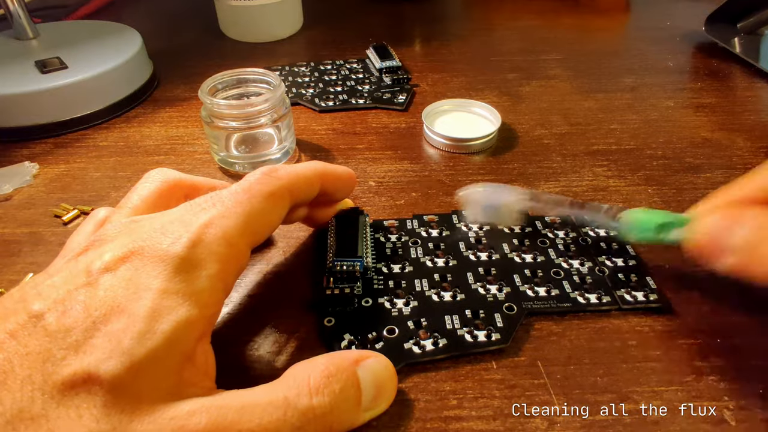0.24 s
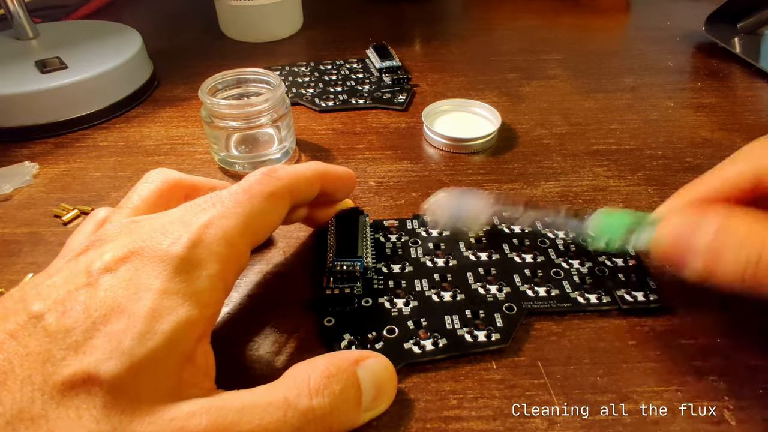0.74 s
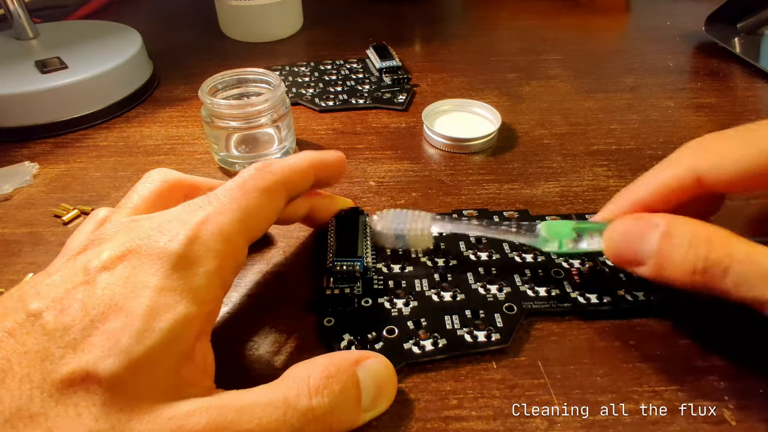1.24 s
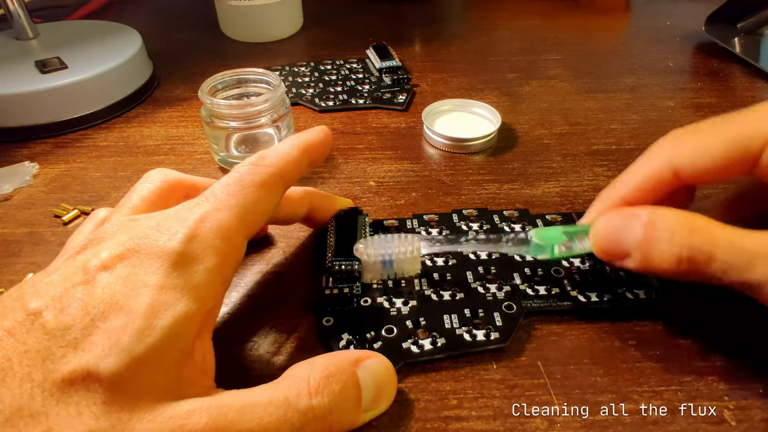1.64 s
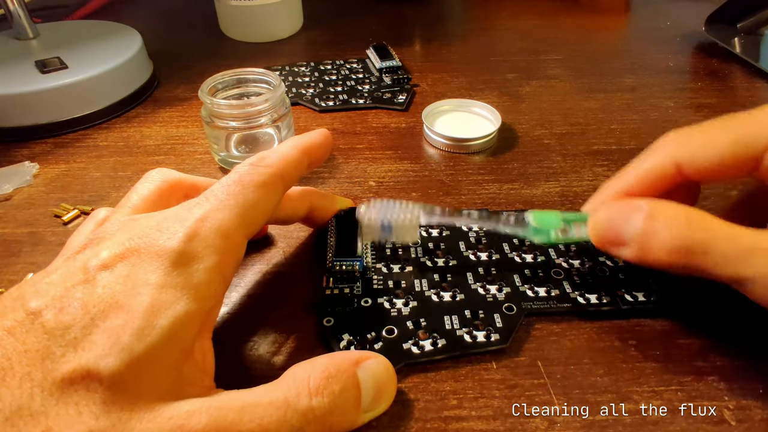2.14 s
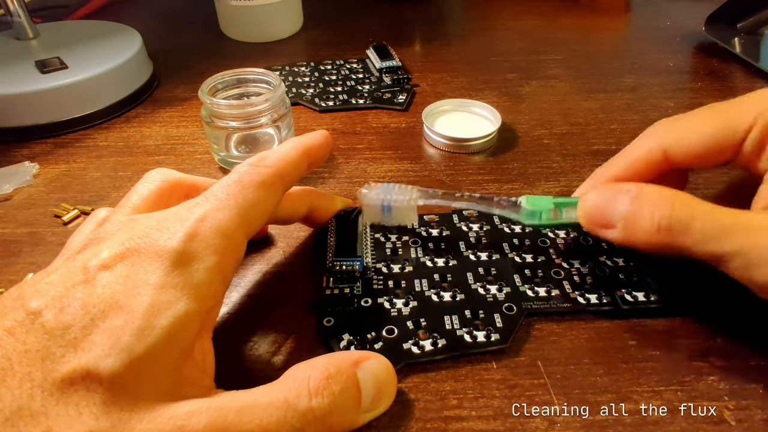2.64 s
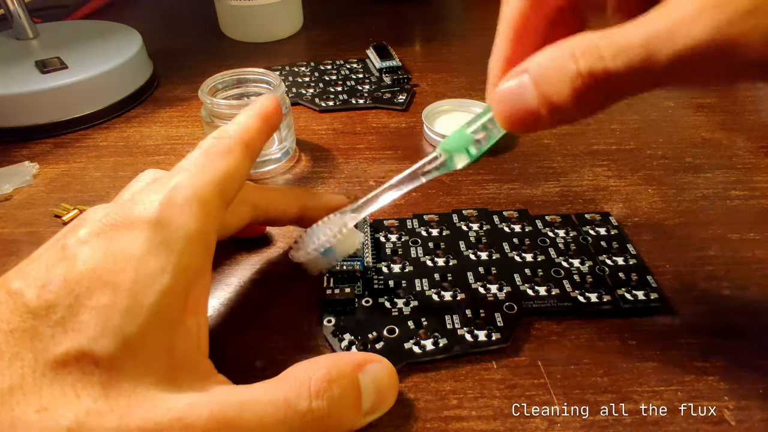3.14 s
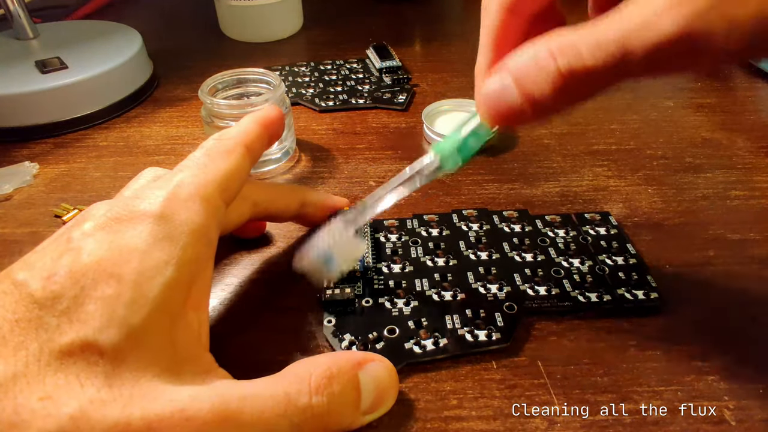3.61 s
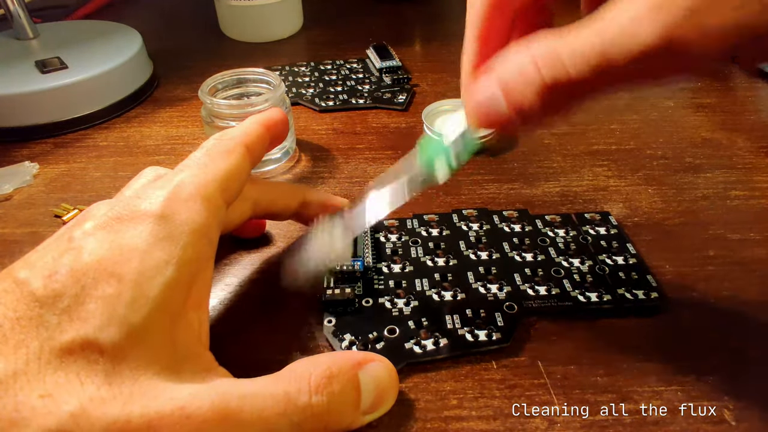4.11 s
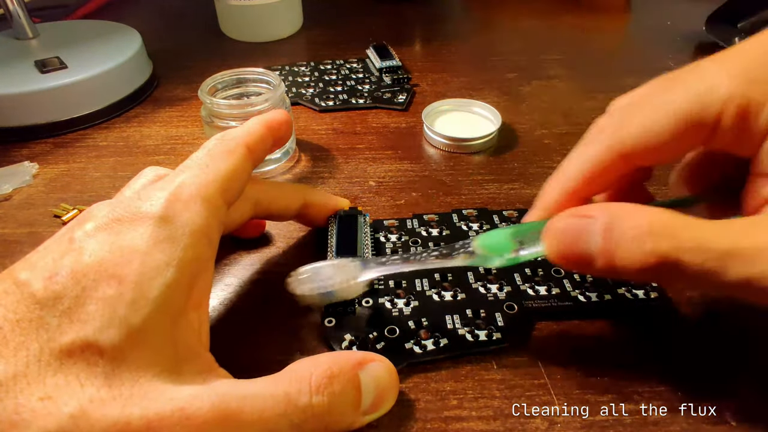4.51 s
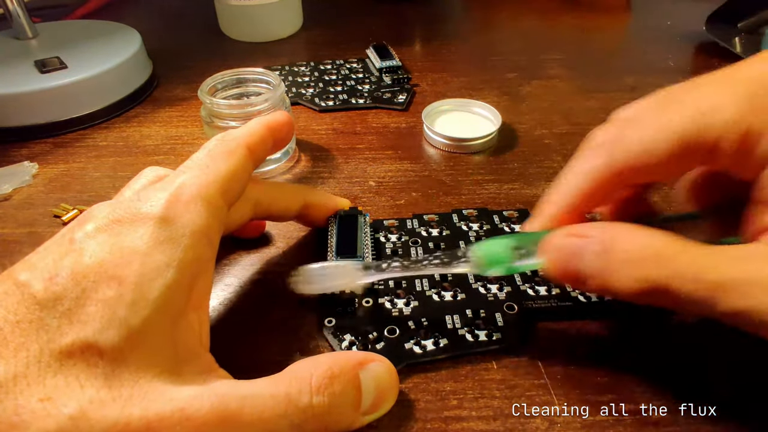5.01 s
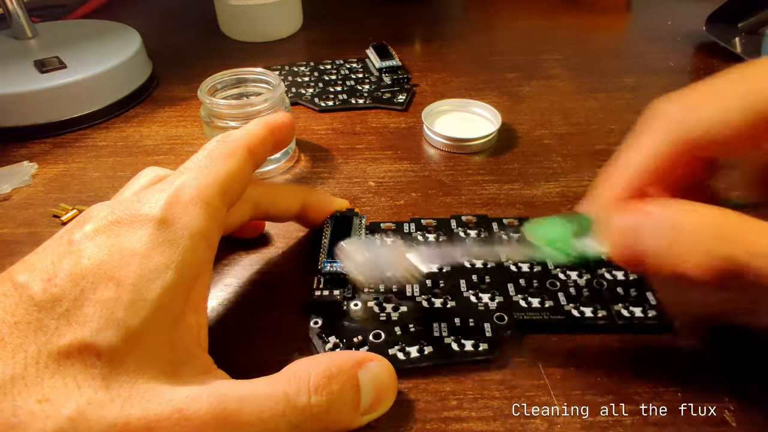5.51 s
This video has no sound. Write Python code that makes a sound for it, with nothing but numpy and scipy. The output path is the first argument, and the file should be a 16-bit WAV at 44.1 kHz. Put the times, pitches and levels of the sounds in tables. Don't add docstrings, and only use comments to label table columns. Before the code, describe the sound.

A toothbrush scrubs a circuit board in quick, even strokes, the board knocking on a wooden desk, then something hard lands with a clatter.

```python
import sys
import numpy as np
from scipy import signal
from scipy.fft import rfft, irfft
from scipy.io import wavfile
from scipy.ndimage import uniform_filter1d

SR = 44100
rng = np.random.default_rng(int(sys.argv[2]) if len(sys.argv) > 2 else 0)


def magnitude_from_level(level_db):
    exponent = np.asarray(level_db, float) / 20
    return 10 ** exponent


def wrap_up_sound(samples):
    columns = np.atleast_2d(samples).T
    tamed = np.clip(columns, -1, 1)
    steps = np.round(tamed * 32767).astype(np.int16)
    wavfile.write(sys.argv[1], SR, steps)


N = 253575
TIME = np.arange(N) / SR

# [t/s, deep rumble level/dB, second rumble level/dB]
TRAFFIC = [(0, -51, -70), (.45, -46, -54.5), (.8, -50, -69.5), (1.25, -44.5, -64), (1.6, -54, -70),
           (2.4, -46.5, -80), (2.7, -45, -56), (3.2, -55, -61), (3.55, -41.5, -66), (4.2, -45, -52),
           (4.6, -47, -45), (5.75, -44.5, -61)]
# [t/s, lower drone level/dB, upper drone level/dB]
DRONE = [(0.0, -48, -56), (0.07, -55, -70), (0.15, -55, -52), (0.66, -66, -70), (0.78, -53, -51),
         (1.21, -44, -86), (1.93, -53.5, -62), (1.99, -57, -79), (2.1, -61, -46), (2.33, -80, -58),
         (2.54, -47.5, -72), (2.83, -62.5, -61), (2.88, -53, -43.5), (3.0, -69, -72), (3.46, -64.5, -65),
         (4.44, -50, -58), (4.53, -57, -61), (5.5, -58, -50)]
# [f/Hz, level/dB per Hz]
AIR = [(60, -18), (110, 5.5), (180, -9), (260, -4), (480, -14.5), (1500, -21), (5000, -33), (16000, -45)]

# [middle t/s, half length/s,
# bristle hiss level/dB]
FIELD = [(0.033, 0.044, -41.5), (0.113, 0.021, -38), (0.168, 0.047, -38.5), (0.292, 0.042, -37),
         (0.417, 0.051, -37), (0.543, 0.039, -36.5), (0.663, 0.053, -37), (0.788, 0.048, -37.5),
         (0.911, 0.037, -35.5), (1.023, 0.05, -38), (1.158, 0.042, -39), (1.288, 0.033, -46),
         (1.415, 0.013, -49.5), (1.533, 0.022, -44.5), (1.644, 0.035, -40), (1.715, 0.026, -54.5),
         (1.868, 0.04, -56), (2.03, 0.051, -56.5), (2.92, 0.055, -54.5)]
# [t/s, half length/s, level/dB]
BESIDE_PINS = [
    (2.112, 0.02, -50.5),
    (2.211, 0.03, -50.5),
    (2.328, 0.026, -49),
    (2.433, 0.029, -44),
    (2.529, 0.051, -46),
    (2.649, 0.031, -41),
    (2.756, 0.04, -44.5),
    (2.863, 0.026, -36.5),
]
# [t/s, half length/s, level/dB]
MODULE = [(3.354, 0.028, -54), (3.474, 0.023, -49), (3.569, 0.024, -44), (3.685, 0.025, -44.5),
          (3.777, 0.025, -40), (3.884, 0.022, -43), (3.973, 0.022, -37), (4.076, 0.016, -41.5),
          (4.172, 0.022, -36), (4.268, 0.026, -40.5), (4.37, 0.042, -46), (4.5, 0.049, -71)]
# [t/s, half length/s, level/dB]
LEFT_EDGE = [
    (4.602, 0.031, -56),
    (4.722, 0.036, -42.5),
    (4.841, 0.037, -41),
    (4.972, 0.032, -39.5),
    (5.072, 0.037, -39.5),
    (5.198, 0.03, -37.5),
    (5.311, 0.034, -37),
    (5.435, 0.035, -36),
    (5.522, 0.017, -43),
    (5.581, 0.012, -38.5),
]
# [tuft scratch relative level/dB, board shake relative level/dB, shake per stroke/dB per dB]
FIRM = [
    (-10, -12.5, 0.93),
    (-7, -6.5, 0.31),
    (-8, -10, 0.5),
    (-6.5, -6, 0.65),
]
# [t/s, place/0-3 in the order above]
PLACE = [(0, 0), (1.7, 0), (2.0, 1), (3.0, 1), (3.2, 2), (4.5, 2), (4.65, 3), (5.75, 3)]
# [t/s, share/0-1]
OVER_PINS = [(0, 0), (1.6, 0), (2.0, 1), (4.4, 1), (4.7, 0), (5.75, 0)]
# [t/s, resting bristles level/dB, board chatter level/dB]
DRAG = [(0.0, -50, -40), (0.82, -48, -40.5), (1.86, -66.5, -55.5), (2.7, -58, -42.5), (3.09, -72, -54),
        (4.02, -52.5, -48), (4.48, -60, -43.5), (5.25, -54.5, -44), (5.59, -49.5, -42), (5.625, -47, -23),
        (5.75, -65, -31.5)]
# [middle t/s, half length/s, level/dB]
SLIDE = [
    (1.42, 0.15, -55),
    (3.526, 0.1, -60),
    (4.628, 0.032, -54),
]

# [f/Hz, level/dB per Hz]
FLAT_HISS = [(2350, -61), (4000, -2.5), (8500, 3.5), (11700, -1.5), (15100, 2), (16000, -28.5)]
# [f/Hz, level/dB per Hz]
PIN_HISS = [(2350, -60), (4000, -5.5), (5760, -4.5), (7790, 2.5), (10200, -3), (13200, 0.5), (15100, -1),
            (16000, -27.5)]
# [f/Hz, level/dB]
SCRATCH = [(900, -20.5), (1400, -0.5), (1800, -6), (2500, -3.5), (3200, -2.5), (4200, -6), (5500, -5.5),
           (9000, -15)]
# [f/Hz, width/Hz, level/dB at right field, beside pins, on module, at left edge]
BOARD = [(505.5, 42.5, -4, 0.5, 1.5, -0.5), (565, 49, -2.5, -1.5, 1, -1.5), (710, 59, -2.5, 3.5, -0.5, 1.5),
         (821, 36, -2, -2.5, -3, -17), (883, 59, -2, -2.5, -2.5, -2), (1143, 225, 3.5, -1, -1.5, -4),
         (1256, 102, 5, 3.5, 1.5, -1), (1333, 220, -4, -6, -6, 0), (1566, 70, -11, -12.5, -7, -16),
         (1780, 140, -8, -13, -14, -20)]
# [f/Hz, width/Hz, level/dB]
DESK = [(148, 136, -1.5), (209, 63, 0.5), (286.6, 21, -3.5), (348, 64, 2), (385.6, 29, 2.5), (427, 120, 1)]

# [fullest t/s, peak level/dB, desk f/Hz, length/s]
BOUNCES = [(0.1455, -30.5, 367, 0.013), (0.3, -20, 357.4, 0.0088), (0.321, -30, 385, 0.0055),
           (.651, -27.5, 352, 0.012), (0.807, -16.5, 383, 0.017), (0.843, -31.5, 417, 0.014),
           (1.042, -22.5, 397, 0.0074), (2.479, -32.5, 383, 0.0061), (2.726, -35.5, 322, 0.015),
           (3.009, -30, 360, 0.024), (3.3, -42, 360, 0.0059), (3.768, -38.5, 385, 0.027),
           (3.963, -39.5, 358, 0.03), (3.98, -35, 385, 0.015), (4.189, -31, 333, 0.0202),
           (4.377, -27, 303, 0.0124), (4.398, -31, 344, 0.014), (4.423, -35, 336, 0.015),
           (4.476, -37, 367, 0.0097), (4.966, -36, 389, 0.016), (5.049, -35.5, 380, 0.0083)]
# [fullest t/s, peak level/dB, desk f/Hz, fade/s]
KNOCKS = [(0.265, -52, 350, 0.0046), (.288, -21, 338, 0.0027), (.552, -31, 390, 0.0083),
          (.62, -36.5, 374, 0.0029), (0.887, -33, 328, 0.015), (.911, -31.5, 416, 0.0044),
          (1.001, -31.5, 356, 0.0028), (1.128, -33.5, 348, 0.0049), (1.155, -37, 323, 0.0082),
          (1.669, -35, 360, 0.015), (1.833, -34.5, 333, 0.01), (2.879, -25, 384, 0.0039),
          (3.28, -40, 345, 0.005), (3.754, -41, 351, 0.015), (3.893, -39.5, 375, 0.0079),
          (4.139, -34.5, 407, 0.0067), (4.222, -31.5, 366, 0.0047), (4.366, -19.5, 356, 0.013)]
# [t/s, peak level/dB]
TAPS = [
    (1.761, -41.5),
    (2.188, -58),
    (2.3, -48),
    (4.127, -38.5),
    (4.673, -57),
]
# [t/s, peak level/dB, desk f/Hz]
NUDGES = [(0.014, -30.5, 340), (0.049, -29.5, 398), (0.086, -35, 385), (0.127, -30, 354), (0.175, -35, 345),
          (0.226, -45, 348), (0.37, -41, 370), (0.408, -32, 400), (0.457, -44, 302), (0.492, -49, 340),
          (0.529, -36, 338), (0.573, -35, 395), (0.593, -40, 387), (0.686, -39, 352), (0.713, -42, 377),
          (0.754, -41, 336), (0.929, -47, 340), (0.961, -38, 387), (1.069, -44, 376), (1.095, -34, 340),
          (1.184, -39, 352), (1.254, -40, 376), (3.799, -38, 367), (3.935, -38, 369), (4.009, -38, 365),
          (4.081, -42, 352), (4.164, -32, 370), (4.268, -43, 376), (4.324, -44, 362), (4.507, -35.5, 423),
          (4.7, -35, 386), (4.73, -37, 385), (4.762, -43.5, 317), (4.817, -39, 383), (4.87, -36, 385),
          (5.019, -35, 386), (5.102, -56, 336), (5.157, -33, 374), (5.191, -35, 340), (5.306, -37, 417),
          (5.378, -30.5, 376), (5.418, -34, 317), (5.451, -33, 320)]
# [t/s, peak level/dB, ring f/Hz]
JOLTS = [(0.182, -42, 725), (0.414, -35, 616), (0.69, -42, 706), (1.54, -39, 577), (1.716, -52, 514),
         (2.078, -48, 835), (2.106, -45, 726), (2.166, -51, 557), (2.187, -41, 725), (2.296, -39, 540),
         (2.335, -35.5, 717), (2.414, -42, 563), (2.611, -36.5, 923), (2.993, -40.5, 533),
         (3.333, -42.5, 514), (3.437, -54, 574), (3.55, -47, 493), (3.729, -36, 510), (3.937, -37, 540),
         (4.03, -42, 497), (4.082, -52, 547), (4.168, -33.5, 540), (4.344, -37, 530), (4.417, -33.5, 532),
         (4.471, -37, 486), (4.583, -43, 500), (4.673, -37.5, 700), (4.8, -50, 700), (4.917, -44, 725),
         (5.028, -32.5, 688), (5.151, -40, 930), (5.366, -50, 560), (5.422, -32.5, 502)]
# [t/s, peak level/dB, treble
# relative level/dB]
TICKS = [(0.2838, -24.5, -18), (0.9966, -24, -21), (1.6007, -42, 9), (1.746, -37, 7), (1.7624, -31, 2),
         (1.8514, -41, -2), (2.4787, -21.5, -30), (2.6105, -39, 9), (3.273, -32.5, 2), (3.773, -27, 11),
         (3.871, -28, 13), (3.9367, -31, 5), (4.127, -37, -3), (4.362, -30, -24), (3.674, -33, -2),
         (4.8245, -25, -3), (5.4175, -32, -2), (5.547, -40, -11), (5.0436, -52, 6), (5.151, -32, 6),
         (5.5638, -28, 8), (5.6132, -11.5, -4), (2.187, -50, 0), (2.295, -47, -4), (3.333, -52, -6),
         (3.730, -45, -8), (4.471, -43, -14), (4.583, -46, -7), (4.671, -45, -13), (1.812, -47, 8),
         (2.138, -44, 10)]

# [t/s, peak level/dB, rattle length/s, tilt/dB per octave, tail relative level/dB]
LANDING = [
    (5.518, -24, 0.0078, -8.5, -3),
    (5.534, -27.5, 0.012, -2.5, -19),
    (5.563, -26, 0.0033, -10, -11),
    (5.609, -20, 0.0022, -7, -14.5),
    (5.6129, -3.5, 0.0059, -1.8, -22.5),
    (5.615, -10.5, 0.002, -3.5, -31),
    (5.625, -29.5, 0.0054, 1.5, -5),
    (5.661, -40, .005, 2, -11),
    (5.717, -31, 0.0032, -3, -2),
]
# [f/Hz, level/dB per Hz]
THUD = [(47, -37), (80, -40.5), (504, -3), (643, -16.5), (900, -6.5), (2300, -10), (8050, -15.5),
        (16000, -39)]
# [f/Hz, width/Hz, level/dB]
DESK_LOW = [(146, 21, 1.5), (196, 10, 3.5), (332, 49, 4), (514, 34, 2.5), (700, 130, 4), (870, 270, 7.5),
            (1140, 150, -8), (1400, 220, -10), (1540, 73, -5), (1860, 90, -1), (2480, 110, -2)]

# [f/Hz, left-right correlation/-1 to 1]
SAME = [(60, .97), (300, .97), (430, .93), (560, .7), (720, .3), (1000, 0), (3000, -.05), (15000, 0)]
# [f/Hz, left minus right level/dB]
BALANCE_DB = [(60, 0.5), (130, 1.5), (290, 1.5), (640, -0.5), (1410, -1), (3100, 2), (6820, -2), (15000, 0)]

DRONE_HZ, DRONE_WIDTH_HZ = (127.6, 150), 5.3
DRONE_WANDER_HZ = 5.0
DRONE_STEADY, DEEP_STEADY, SECOND_STEADY = 1.4, 1.6, 2.5
AIR_DB = -54

FIRM_DB = -40
LATE = 0.43
SCRATCH_FOLLOWS = 0.81
SHAKE_ONSET = 3.2

BOUNCE_SWELL, BOUNCE_RING_DB = 0.429, -13
HARD_FROM_DB, RING_PER_DB = -22, 0.47
KNOCK_SWELL_S, KNOCK_RING_DB = 0.00355, -1
TAP_HZ, TAP_SWELL_S, TAP_FADE_S, TAP_RING_DB = 385, 0.0016, 0.0058, 5.5
NUDGE_DB, NUDGE_SWELL_S, NUDGE_FADE_S, NUDGE_RING_DB = -5.5, 0.00482, 0.0084, -27
JOLT_DB, JOLT_SWELL_S, JOLT_FADE_S, JOLT_RING_DB = -7, 0.00067, 0.014, 1
MIX_DB = 4.5
RING_ON_DB, RING_ON_T60_S = -13, 0.28
TAIL_T60_S = 0.37
EDGE_HZ = 15960


def evened(x):
    return x / np.sqrt(np.mean(x ** 2) + 1e-20)


def read(points, hz):
    f, value = np.transpose(points)
    return np.interp(np.log(hz + 1), np.log(f + 1), value)


def curve(rows, column):
    return np.interp(TIME, *np.transpose(rows)[[0, column]])


def add(mix, s, sound):
    part = mix[..., round(s * SR):][..., :sound.shape[-1]]
    part += sound[..., :part.shape[-1]]


def coloured(x, points):
    log_gain = np.log(magnitude_from_level(read(points, abs(np.fft.fftfreq(4096, 1 / SR)))))
    taps = np.fft.ifft(np.exp(np.conj(signal.hilbert(log_gain)))).real[:2048]
    return signal.oaconvolve(x, taps[None], axes=1)[:, :x.shape[1]]


def resonate(x, hz, width):
    turn = np.exp(2j * np.pi * np.cumsum(hz * np.ones(x.shape[-1])) / SR)
    r = np.exp(-np.pi * width / SR)
    return 2 * (turn * signal.lfilter([1 - r], [1, -r], x / turn)).real


def modes(x, table):
    out = 0
    for k, (hz, width, db) in enumerate(table):
        r, w = np.exp(-np.pi * width / SR), 2 * np.pi * hz / SR
        ring = signal.lfilter([1, 0, -1], [1, -2 * r * np.cos(w), r * r], x)
        out = out + (-1) ** k * magnitude_from_level(db) * np.sqrt(width) * ring
    return out


def paired(x):
    a, b = rfft(x)
    same = np.clip(read(SAME, np.fft.rfftfreq(x.shape[1], 1 / SR)), -1, 1)
    return irfft(np.array([a, same * a + np.sqrt(1 - same ** 2) * b]), x.shape[1])


def wavering(hz, wander_hz):
    stray = np.interp(TIME, np.linspace(0, TIME[-1], num=40), rng.standard_normal(40))
    return np.sin(2 * np.pi * np.cumsum(hz + wander_hz * stray) / SR)


def traffic():
    far, air = (paired(z) for z in rng.standard_normal((2, 2, N)))
    deep = evened(resonate(resonate(far, 33, 12), 33, 20))
    deep = deep + DEEP_STEADY * wavering(33, DRONE_WANDER_HZ / 2)
    out = magnitude_from_level(curve(TRAFFIC, column=1)) * evened(deep)
    second = evened(resonate(far, 55, 10)) + SECOND_STEADY * wavering(56.5, 0.97)
    out += magnitude_from_level(curve(TRAFFIC, column=2)) * evened(second)
    for k, hz in enumerate(DRONE_HZ):
        drone = evened(resonate(far, hz, DRONE_WIDTH_HZ)) + DRONE_STEADY * wavering(hz, DRONE_WANDER_HZ)
        out += magnitude_from_level(curve(DRONE, column=k + 1) - 1.0) * evened(drone)
    return out + magnitude_from_level(AIR_DB) * evened(coloured(air, AIR))


def snaps(per_s, spread_db, blur):
    size = magnitude_from_level(spread_db * np.minimum(rng.exponential(1, N), 5))
    size = size * (rng.random(N) < per_s / SR)
    size = evened(uniform_filter1d(size, size=3))
    return paired((size + blur) * rng.standard_normal((2, N)))


def pings(per_s, spread_db):
    size = magnitude_from_level(spread_db * np.minimum(rng.exponential(1, (8, N)), 3))
    size = size * (rng.random((8, N)) < per_s / 8 / SR)
    pitch = np.geomspace(3500, 15000, num=8)[:, None]
    twang = np.hanning(36) * np.sin(2 * np.pi * pitch * np.arange(36) / SR)
    rung = signal.oaconvolve(size, twang, axes=1)[:, :N]
    flipped = rung * rng.choice([-1., 1.], (8, 1))
    return evened(np.array([rung.sum(0), flipped.sum(0)]))


def effort(part, drop_db=6.0, flat=1.67, onset=2.16):
    power, t = np.zeros(N + SR), np.arange(-SR // 9, SR // 9) / SR
    for (scratch_db, shake_db, follows), strokes in zip(FIRM, (FIELD, BESIDE_PINS, MODULE, LEFT_EDGE)):
        for s, half, hiss_db in strokes:
            u = (t - LATE * half) / half
            bend = np.where(u < 0, onset, flat)
            u = np.where(u < 0, -u / (1 + LATE), u / (1 - LATE))
            over_db = hiss_db - FIRM_DB
            level_db = {"hiss": over_db,
                        "scratch": scratch_db + SCRATCH_FOLLOWS * over_db,
                        "shake": shake_db + follows * over_db}[part]
            add(power, s, magnitude_from_level(2 * (FIRM_DB + level_db - drop_db * u ** bend)))
    return power[SR // 9:][:N]


def uneven(hz, db):
    lumps = signal.lfilter([1], [1, -np.exp(-2 * np.pi * hz / SR)], rng.standard_normal(N))
    return magnitude_from_level(db * evened(uniform_filter1d(lumps, size=240)))


def patchy(x, db):
    z = signal.stft(x, nperseg=256)[2]
    field = uniform_filter1d(rng.standard_normal(z.shape[1:]), size=7, axis=0)
    field = evened(uniform_filter1d(field, size=13, axis=1))
    return signal.istft(z * magnitude_from_level(db * field), nperseg=256)[1][:, :N]


def board_db(t):
    place = np.interp(t, *np.transpose(PLACE))
    return np.array([np.interp(place, np.arange(len(row) - 2), row[2:]) for row in BOARD])


def tip_hiss(rest):
    tips = evened(snaps(2200, 2.5, 2.2)) + 0.2 * pings(500, 4.5)
    over_flat = evened(coloured(tips, FLAT_HISS[:-1]))
    over_pins = evened(coloured(tips, PIN_HISS[:-1]))
    pins = curve(OVER_PINS, column=1)
    tips = (1 - pins) * over_flat + pins * over_pins
    return tips * np.sqrt(effort("hiss") + magnitude_from_level(-9.0) * rest)


def tuft_scratch(tuft, rest):
    return evened(coloured(tuft, SCRATCH)) * np.sqrt(effort("scratch", drop_db=5.5) + magnitude_from_level(-11.0) * rest)


def board_shake(rest):
    grit = snaps(1400, 1.6, 1.4)
    table = [(hz, width, db) for (hz, width, *_), db in zip(BOARD, board_db(TIME))]
    body = evened(modes(grit, table))
    shake = np.sqrt(effort("shake", drop_db=4.0, onset=SHAKE_ONSET) + magnitude_from_level(-9.0) * rest)
    shake = np.roll(shake, shift=-120)
    return magnitude_from_level(1.0) * shake * body


def sideways_slide(tuft):
    colour = [(1500, -5.5), (3200, -8.5), (3800, -3.0), (4700, -4.0), (5400, -18), (6500, -27)]
    level = sum(magnitude_from_level(db - 4.3 * abs((TIME - s) / half) ** 3) for s, half, db in SLIDE)
    return level * evened(coloured(tuft, colour))


def bristles():
    rest = magnitude_from_level(2 * curve(DRAG, column=1))
    tuft = snaps(1200, 3.8, 3.9)
    strokes = tip_hiss(rest) + tuft_scratch(tuft, rest) + board_shake(rest)
    return patchy(strokes, db=1.6) * uneven(25, 1.5) + sideways_slide(tuft[:, ::-1])


def chatter():
    push = np.sqrt(effort("shake", drop_db=10.5))
    push = 1.0 + push / uniform_filter1d(push + 1e-5, size=12000)
    rub = snaps(400, 2.5, 0.8)
    return magnitude_from_level(curve(DRAG, column=2) - 4.0) * evened(modes(rub * push, DESK))


def contacts():
    dull = [(s, db, hz, BOUNCE_SWELL * length, (1 - BOUNCE_SWELL) * length,
             BOUNCE_RING_DB + RING_PER_DB * max(db - HARD_FROM_DB, 0)) for s, db, hz, length in BOUNCES]
    edge = [(s, db, hz, KNOCK_SWELL_S, fade, KNOCK_RING_DB) for s, db, hz, fade in KNOCKS]
    taps = [(s, db, TAP_HZ, TAP_SWELL_S, TAP_FADE_S, TAP_RING_DB) for s, db in TAPS]
    nudges = [(s + NUDGE_SWELL_S, db + NUDGE_DB, hz, NUDGE_SWELL_S, NUDGE_FADE_S, NUDGE_RING_DB)
              for s, db, hz in NUDGES]
    jolts = [(s + JOLT_SWELL_S, db + JOLT_DB, hz, JOLT_SWELL_S, JOLT_FADE_S, JOLT_RING_DB)
             for s, db, hz in JOLTS]
    return dull + edge + taps + nudges + jolts


def knocks():
    blows = contacts()
    desk, board, t = np.zeros((2, N)), np.zeros((2, N)), np.arange(SR // 14) / SR
    chance = rng.uniform(-1, 1, (len(blows), 3, len(BOARD), 1))
    hz, width = np.transpose(BOARD)[:2, :, None]
    for (s, peak_db, desk_hz, swell, fade, ring_db), (share, left, right) in zip(blows, chance):
        u = t - 2 * swell
        fade_db = np.maximum(-6.0 * abs(u / fade) ** 2.2, RING_ON_DB - 60 * u / RING_ON_T60_S)
        shape_db = np.where(u < 0, -6.0 * abs(u / swell) ** 3, fade_db)
        add(desk, s - 2 * swell, magnitude_from_level(peak_db + shape_db) * np.cos(2 * np.pi * desk_hz * u))

        thump = np.sin(2 * np.pi * 148 * t) * magnitude_from_level(-60 * t / 0.18)
        add(desk, s - swell, magnitude_from_level(peak_db + ring_db - 14.0) * thump)

        lag = np.array([left, right]) * np.clip(hz / 600 - 0.8, 0, 3)
        level = magnitude_from_level(board_db(s)[:, None] - 10.7 * np.log2(hz / 500) + MIX_DB * share)
        decay = np.exp(-1.3 * np.pi * width * t)
        ring = (level * decay * np.sin(2 * np.pi * hz * t + lag)).sum(1)
        ring *= 1 - np.exp(-t / (0.45 * swell))
        add(board, s - 0.8 * swell, magnitude_from_level(peak_db + ring_db) * ring / abs(ring).max())
    return desk, board


def ticks():
    out, t = np.zeros((2, N)), np.arange(800) / SR
    for s, db, treble_db in TICKS:
        noise = rng.standard_normal((2, 800))
        colour = [(900, -5.5), (2600, -5.5), (4600, -9.0), (7000, treble_db), (15000, treble_db - 15)]
        crack = coloured(noise * np.exp(-t / 0.0014), colour)
        add(out, s, magnitude_from_level(db + 0.5) * crack / abs(crack).max())
    return out


def landing():
    out, push, t = np.zeros((2, N)), np.zeros(N), np.arange(SR // 3) / SR
    clatter = uneven(70, 2.6)[:len(t)]
    for s, db, length, tilt_db, tail_db in LANDING:
        noise = rng.standard_normal((2, 2, len(t)))
        colour = [(hz, level + tilt_db * np.log2(hz / 500)) for hz, level in THUD]
        burst = np.exp(-(t / length) ** 2) * np.minimum(t / 0.00016, 1)
        blow = coloured(paired(noise[0]) * burst, colour)
        low = signal.lfilter(*signal.butter(1, 2500, fs=SR), blow)
        blow = low + (blow - low) * 0.7 * np.exp(-t / length)

        dull = [(hz, level - 3.3 * np.log2(1 + (hz / 7000) ** 2)) for hz, level in colour]
        tail = evened(coloured(paired(noise[1]), dull)) * np.minimum(t / 0.0031, 1)
        slow = signal.lfilter(*signal.butter(2, 4500, fs=SR), tail)
        tail = slow + (tail - slow) * magnitude_from_level(-60 * t / 0.16)
        tail *= magnitude_from_level(tail_db - 60 * t / TAIL_T60_S) * clatter
        add(out, s, magnitude_from_level(db) * (blow / abs(blow).max() + tail))
        add(push, s, magnitude_from_level(db) * np.hanning(24))
    boom = modes(push, DESK_LOW)
    return out + magnitude_from_level(-6.0) * boom / abs(boom).max()


def room(x):
    taps = rng.choice([-1., 1.], (2, SR // 3)) * (rng.random((2, SR // 3)) < 2000 / SR)
    hz, t, z = signal.stft(taps, SR, nperseg=256)
    t60 = read([(120, 0.48), (900, 0.47), (6000, 0.07), (15000, 0.011)], hz)[:, None]
    tail = signal.istft(z * magnitude_from_level(-60 * t / t60), SR, nperseg=256)[1]
    tail[:, :150] = 0
    tail /= np.linalg.norm(tail[0])
    return paired(signal.fftconvolve(x.mean(0)[None], tail, axes=1)[:, :N])


def scene():
    background, brush, rub = traffic(), bristles(), chatter()
    desk, board = knocks()
    hits = board + ticks()
    wet = room(magnitude_from_level(-19) * desk + magnitude_from_level(-15) * hits + magnitude_from_level(-15.0) * brush)
    return desk + hits + brush + wet + rub + landing() + background


def top_cut(x):
    return signal.sosfilt(signal.butter(12, 16470, fs=SR, output="sos"), x)


def record(dry):
    hz = np.fft.rfftfreq(N, 1 / SR)
    half_db = read(BALANCE_DB, hz) / 2
    edge_db = -45 * np.clip((hz - EDGE_HZ) / 80 + 1, 0, 1)
    mix = irfft(rfft(dry) * magnitude_from_level(np.array([half_db, -half_db]) + edge_db), N)
    return top_cut(mix)


dry = scene()
out = record(dry)
wrap_up_sound(out)
```